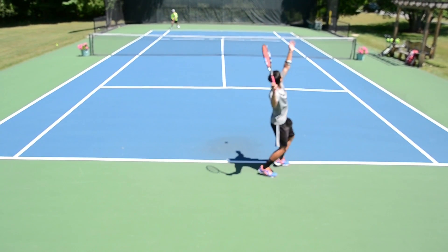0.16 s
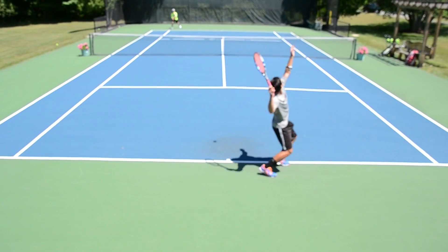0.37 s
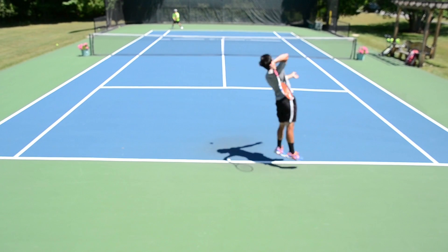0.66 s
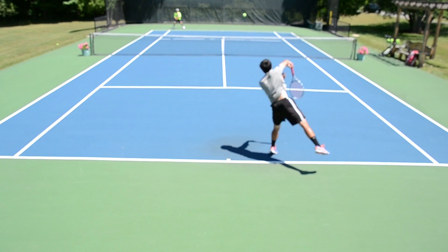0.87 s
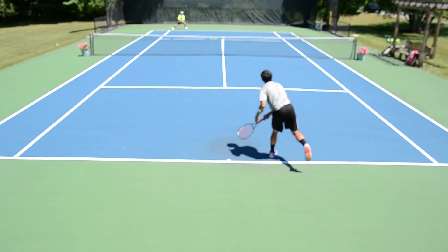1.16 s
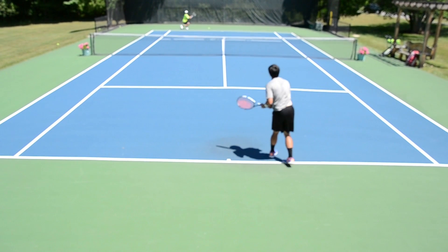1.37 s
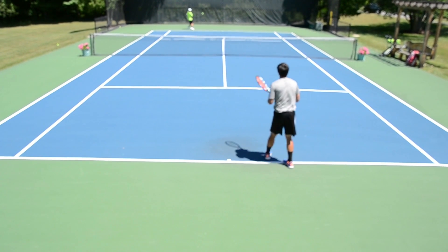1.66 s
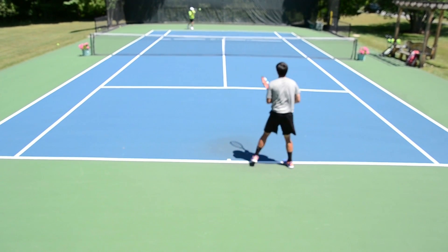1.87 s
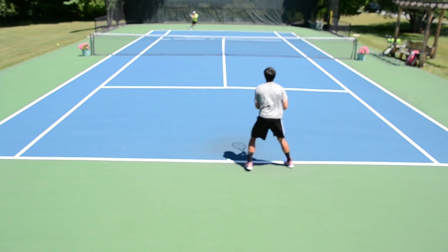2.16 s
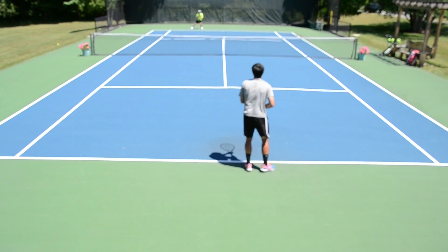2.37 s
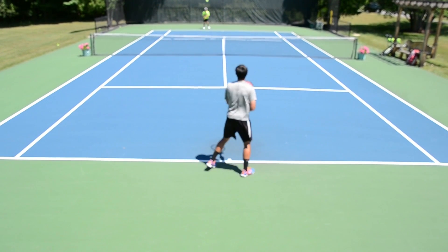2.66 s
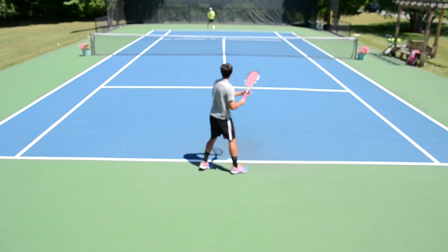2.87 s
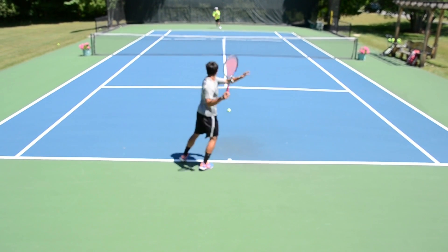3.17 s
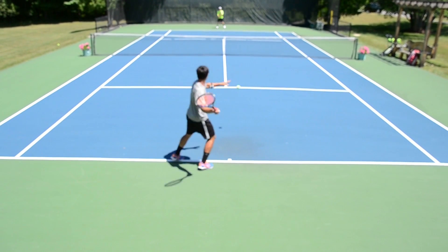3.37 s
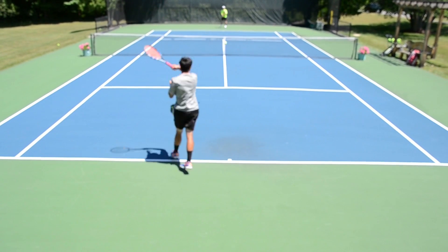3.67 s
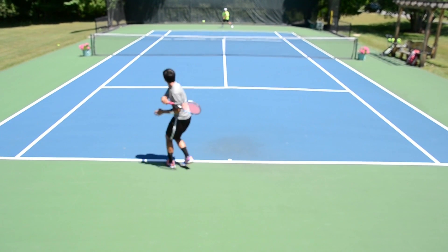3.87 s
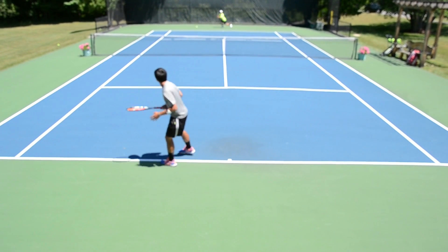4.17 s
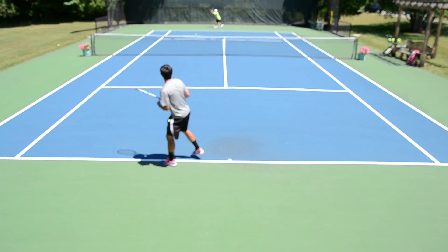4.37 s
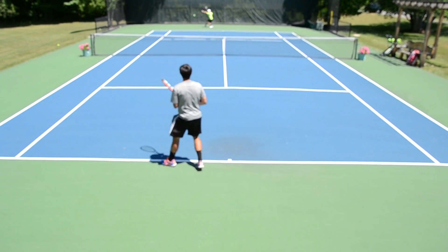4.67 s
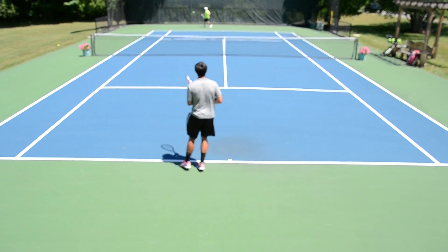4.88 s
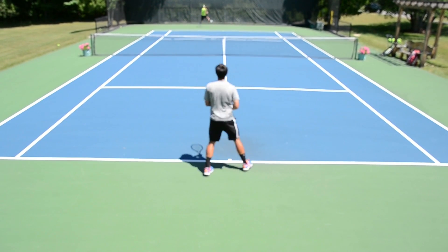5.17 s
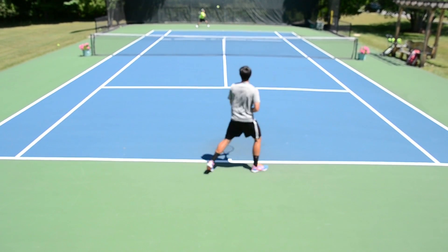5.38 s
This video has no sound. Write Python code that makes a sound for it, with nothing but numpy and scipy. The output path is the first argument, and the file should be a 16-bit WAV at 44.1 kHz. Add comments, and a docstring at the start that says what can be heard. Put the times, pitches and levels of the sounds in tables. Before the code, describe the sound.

An outdoor hard court heard in mono from behind the near baseline, over a quiet airy wash, uneven low rumble and faint, wavering machine whine. Tiny shoe squeaks at 0.6 s precede the serve at 0.85 s: a loud, dry pop with thump, felt crack, briefly ringing strings, a slight swish and quick fence echoes. A landing click follows at 0.97 s, squeaks and a scuff near 1.1 s, soft taps around 1.4 s and a squeak at 1.6 s. The far player's return pops at 1.98 s, softer and more reverberant. Gritty shuffles run from 2.1 to 2.8 s. The ball bounces with a hollow knock at 3.28 s, then the near player hits at 3.67 s, rounder, with a swish. A clicky footfall and strong short squeak come at 3.8 s. Scuffs, taps and faint squeaks continue from 4.0 to 4.9 s; a far hit sounds at 5.13 s, with a last tiny squeak at 5.4 s.

```python
"""Rackets pop in a serve and a short rally on an outdoor hard court, heard from behind the near baseline.
Each stroke is a thump, a felt crack and ringing strings, with echoes from the ground and fences.
Ball and soles land with a click, ring and thump; shoes squeak as gliding tones and scuff as grainy noise.
Swings swish as coloured noise; far off lie an airy wash, an uneven rumble and the whine of a machine."""
import sys
import numpy as np
from scipy import signal
from scipy.fft import rfft, irfft
from scipy.io import wavfile

SR = 44100
rng = np.random.default_rng(int(sys.argv[2]) if len(sys.argv) > 2 else 0)


def transcribe(u):
    """Save the signal u as a 16-bit wav file named by the first command-line argument.

    u: samples, shape (n,) or (channels, n), limited to [-1, 1]; the rate is SR.
    q: integer samples, one column per channel.
    """
    v = np.clip(np.atleast_2d(u).T, -1, 1)
    q = np.round(v * 32767).astype(np.int16)
    wavfile.write(sys.argv[1], SR, q)


N = 243873
TIME = np.arange(N) / SR
BRIEF = TIME[:SR // 10]   # the first 0.1 s, long enough for any single contact

# Strokes of the near and the far player. Each row: start in seconds, level in dB, string tuning ratio,
# thump in dB, thump in Hz, crack in dB, ground echo lag in seconds, ground echo in dB, bass edge in Hz.
NEAR_STROKES = [(0.8472, -13.5, 0.982, 4, 450, -4.5, 0.0066, -3, 50),
                (3.6700, -14.5, 1.034, 0.5, 443, -12.5, 0.003724, 4, 170)]
FAR_STROKES = [(1.9778, -23.5, 0.938, -0.31, 428, -12, 0.0021, -22, 80),
               (5.1258, -18.5, 0.96, -3, 388, -12, 0.002, -13, 80)]
# String bed and frame modes of each racket, before tuning.
# Each row: frequency in Hz, level in dB, build-up in seconds, t60 in seconds.
NEAR_RACKET_MODES = [(569, -4.5, 0.0025, 0.0075), (819, 0, 0.0046, 0.012), (1084, -19.5, 0.0003, 0.044),
                     (1231, -16.5, 0.00055, 0.027), (1457, -3, 0.00078, 0.0064),
                     (1723, -25.5, 0.006, 0.033), (2190, -14.5, 0.00032, 0.012), (2820, -44, 0.0038, 0.022)]
FAR_RACKET_MODES = [(750, -11.5, 0.0055, 0.015), (1094, -2.5, 0.0053, 0.0054), (1380, -6, 0.0012, 0.0085),
                    (1730, -8, 0.00035, 0.019), (2194, -8, 0.00094, 0.01), (3430, -26, 0.0036, 0.0086)]
# Colour of the felt crack. Each row: frequency in Hz, relative density in dB per Hz.
CRACK_SPECTRUM = [(200, -4), (700, 6.5), (1500, 14.5), (2500, -2.5), (3800, 1), (5700, -13), (7500, -24),
                  (9500, -29), (11500, -64)]
# Reflections of each player's strokes from the fences. Each row: lag in seconds, level in dB.
NEAR_ECHOES = [(0.037, -16), (0.072, -27), (0.090, -35)]
FAR_ECHOES = [(0.023, -12.5), (0.035, -22.5), (0.262, -23)]


def strokes(table, modes, echoes, thump_t60, crack_t60, downward_db, echo_t60):
    """The ball flattens with a thump and a crack of felt, and leaves the strings ringing."""
    out = np.zeros(N)
    for s, db, tuning, thump_db, thump_hz, crack_db, ground_s, ground_db, bass_hz in table:
        strings = sum(from_db(mode_db) * mode(hz * tuning, build_up, t60)
                      for hz, mode_db, build_up, t60 in modes)
        thump = from_db(thump_db) * mode(thump_hz, build_up=0.0011, t60=thump_t60)
        # the higher the contact, the later the ground echo; the tilted face beams the crack downward
        direct_path = (0, 0, 0)
        ground_path = (ground_s, ground_db, downward_db)
        for lag, path_db, beam_db in [direct_path, ground_path]:
            felt = noise(CRACK_SPECTRUM, size=len(BRIEF)) * struck(build_up=0.00054, t60=crack_t60)
            crack = from_db(crack_db + beam_db) * felt
            hit = band_pass(strings + thump + crack, bass_hz, high_hz=16000)
            add(out, s + lag, from_db(db + path_db) * hit)
    dull = band_pass(off_axis(out), low_hz=470, high_hz=1900)
    for lag, echo_db in echoes:
        add(out, lag, from_db(echo_db) * smear(dull, t60=echo_t60))
    return out


def off_axis(x, hz=840, width_hz=260, dip_db=-6):
    """The main tone of the strings is beamed along the stroke, so less of it reaches the fences."""
    tone = signal.lfilter(*signal.iirpeak(hz, hz / width_hz, fs=SR), x)
    return x - (1 - from_db(dip_db)) * tone


# Ball and soles landing on the court.
# Each row: start in seconds, level in dB, ring in Hz, click in dB relative to the ring.
LANDINGS = [(0.9739, -27, 1240, 11), (1.021, -39, 500, -16), (1.3798, -30.5, 1210, -5),
            (1.4316, -36, 845, -20), (3.1295, -34.5, 820, -23), (3.2785, -18.5, 1143, -20),
            (3.8034, -24, 955, 11.5), (3.8466, -25.5, 1170, -13), (4.5008, -30.5, 1620, -6.5),
            (5.0560, -33, 1150, -11)]
LANDING_CYCLES = 5.9   # every landing rings for the same number of cycles
LANDING_THUMP_DB = -14


def landings():
    """A click on the hard paint, a hollow ring and a low thump."""
    out = np.zeros(N)
    click = band_pass(np.exp(-BRIEF / 0.00008), low_hz=500, high_hz=5000, order=1)
    click = low_pass(click, hz=5500, order=10)
    click = click / click.max()
    thump = from_db(LANDING_THUMP_DB) * mode(hz=286, build_up=0.0053, t60=0.0019)
    for s, db, hz, click_db in LANDINGS:
        ring = mode(hz, build_up=0.00053, t60=LANDING_CYCLES / hz)
        add(out, s, from_db(db) * (ring + thump + from_db(click_db) * click))
    return out


# Rubber soles slipping. Each row: start in seconds, length in seconds, start in Hz, end in Hz, level in dB,
# growth over the slip in dB, roughness from 0 to 1, octave in dB, share beamed down the court in dB.
SQUEAKS = [(0.572, 0.08, 2200, 2370, -60.5, 0, 0.3, -31, -14),
           (0.649, 0.039, 4200, 3680, -52.5, 3, 0.72, -36, -8),
           (1.062, 0.04, 3126, 3495, -42.5, -9.5, 0.84, -19, 2),
           (1.1, 0.044, 3230, 3110, -47, 3.5, 0.62, -23, 8),
           (1.604, 0.082, 4900, 3910, -41.5, 9.5, 0.68, -26.5, -2),
           (3.803, 0.028, 2400, 2595, -21, 5.5, 0.48, -18.5, -21.5),
           (4.557, 0.03, 3560, 3250, -53.5, 6, 0.35, -19, 10),
           (4.584, 0.029, 3004, 2670, -40, -6.5, 0.73, -29, 4.5),
           (4.807, 0.052, 4800, 4050, -55, 9, 0.66, -33, 4),
           (5.424, 0.017, 5120, 3470, -57.5, -1, 0.8, -42, -12)]
SETTLE_SHARE, RELEASE_SHARE = 0.7, 0.2   # shares of a slip spent settling in pitch and letting go
SMOOTHING = 0.37   # share of the roughness lost as the pitch settles
PITCH_JITTER = 0.1   # rms share of the pitch at full roughness


def squeaks(flutter_db=5, rasp_db=-5, ring_hz=220, catch_s=0.003):
    """Stick and slip of rubber: a tone that catches roughly, glides, settles and lets go, with its echoes."""
    out, beamed, size = np.zeros(N), np.zeros(N), len(BRIEF)
    for s, length, start_hz, end_hz, db, growth_db, rough, octave_db, beam_db in SQUEAKS:
        progress = np.minimum(BRIEF / length, 1)
        glide = np.sin(np.pi / 2 * np.minimum(progress / SETTLE_SHARE, 1)) ** 2
        uneven = rough * (1 - SMOOTHING * glide)

        jitter = PITCH_JITTER * uneven * resonant_noise(0, 750, size=size)
        pitch = (start_hz + (end_hz - start_hz) * glide) * (1 + jitter)
        phase = 2 * np.pi * np.cumsum(pitch) / SR
        overtones = np.sin(2 * phase) + from_db(-21.5) * np.sin(3 * phase)
        tone = np.sin(phase) + from_db(octave_db) * overtones
        rasp = from_db(rasp_db) * uneven * resonant_noise(start_hz, 620, size=size)

        contact = np.minimum(BRIEF / catch_s, 1) * np.minimum((1 - progress) / RELEASE_SHARE, 1)
        flutter = flutter_db * uneven * resonant_noise(0, 200, size=size)
        grip = contact * from_db(growth_db * (progress - .5) + flutter)
        grip = low_pass(grip, hz=ring_hz, order=1)   # the tread rings on briefly
        squeak = from_db(db) * grip * (np.sqrt(2) * tone + rasp)
        add(out, s, squeak)
        add(beamed, s, from_db(beam_db) * squeak)
    return out + side_fence(out) + back_fence(beamed)


# The side fence answers the squeaks. One row: lag in seconds, level in dB, t60 in seconds.
SIDE_FENCE = (0.023, -15.5, 0.3)


def side_fence(x):
    """A blurred return that lingers briefly after a squeak."""
    lag, db, t60 = SIDE_FENCE
    out = np.zeros(N)
    add(out, lag, from_db(db) * smear(band_pass(x, low_hz=3400, high_hz=4400), t60))
    return out


BACK_FENCE_S, BACK_FENCE_SPREAD_S = 0.17, 0.056   # lag of the strongest return, spread around it


def back_fence(x, hz=3150, width_hz=330, scale_db=-15):
    """Shoe noise skims along the court and returns blurred from the far end."""
    blur = swell(BACK_FENCE_S, BACK_FENCE_SPREAD_S, BACK_FENCE_SPREAD_S)
    response = (resonant_noise(hz, width_hz) * blur)[:SR]
    response = response / np.abs(rfft(response)).max() * 2   # strongest frequency at gain 2
    return from_db(scale_db) * signal.fftconvolve(x, response)[:N]


# Soles dragging over grit.
# Each row: time of the strongest drag in seconds, rise in seconds, tread level in dB, grit level in dB.
SCUFFS = [(1.085, 0.011, -43.5, -45.5), (1.461, 0.0089, -44, -44.5), (2.085, 0.063, -72, -57.5),
          (2.184, 0.033, -50.5, -51.5), (2.444, 0.0092, -60.5, -48.5), (2.486, 0.013, -40, -66),
          (2.586, 0.053, -47, -49.5), (2.803, 0.014, -63, -52.5), (3.138, 0.015, -69, -58),
          (4.045, 0.035, -60, -51), (4.120, 0.026, -67, -58.5), (4.630, 0.048, -52, -51.5),
          (4.892, 0.021, -60.5, -55)]
# Colour of the grit. Each row: frequency in Hz, relative density in dB per Hz.
GRIT_SPECTRUM = [(500, -17), (1500, 18.5), (3000, 9.5), (5500, 0.5), (7500, -16), (9800, -36.5),
                 (11500, -92.5)]
SCUFF_STOP_S, TREAD_HZ = 0.012, 2730   # every drag stops as quickly and rings the same tread


def scuffs(width_hz=600, grain_db=2.0):
    """A sliding sole: grainy hiss of grit and a broad resonance of the tread."""
    grit = noise(GRIT_SPECTRUM)
    tread = resonant_noise(TREAD_HZ, width_hz)
    drags = sum(swell(s, rise, SCUFF_STOP_S) * (from_db(tread_db) * tread + from_db(grit_db) * grit)
                for s, rise, tread_db, grit_db in SCUFFS)
    return drags * from_db(grain_db * resonant_noise(0, 320))


# Racket cutting the air.
# Each row: time of the fastest point in seconds, rise in seconds, fall in seconds, level in dB.
SWISHES = [(0.848, 0.029, 0.044, -47), (3.672, 0.013, 0.09, -45)]
# Colour of the rushing air. Each row: frequency in Hz, relative density in dB per Hz.
SWISH_SPECTRUM = [(100, -49), (300, 8.5), (900, 3.5), (2000, 8.5), (4000, -6), (7000, -21.5), (11000, -50)]


def swishes():
    """Air rushes through the strings around the fastest point of each swing."""
    swings = sum(from_db(db) * swell(s, rise, fall) for s, rise, fall, db in SWISHES)
    return noise(SWISH_SPECTRUM) * swings


# Scatter from fences and trees.
# Each row: frequency in Hz, early gain in dB, early t60 in seconds, late gain in dB.
SCATTER = [(198, -13, 0.22, -24), (487, -29.5, 0.15, -34), (900, -18.5, 0.35, -16.5),
           (1610, -15, 0.13, -19.5), (3000, -17, 0.14, -25.5), (4970, -15, 0.27, -33),
           (10000, -10, 0.17, -28)]
LATE_T60_S = 1


def surroundings(x):
    """Quick scatter from the fences, then a faint long tail from the trees."""
    t, response = TIME[:SR], 0
    onset = 1 - np.exp(-(t / 0.0034) ** 2)
    late = onset * from_db(-60 * t / LATE_T60_S)
    edges = np.geomspace(100, 12800, 8)   # octave bands, in Hz
    for low, high in zip(edges, edges[1:]):
        hz = np.sqrt(low * high)
        octave = signal.butter(3, [low, high], "band", fs=SR, output="sos")
        band = signal.sosfilt(octave, rng.standard_normal(SR))
        early = onset * from_db(-60 * t / at_hz(SCATTER, hz, axis=2))
        fences = from_db(at_hz(SCATTER, hz)) * early / np.linalg.norm(early)
        trees = from_db(at_hz(SCATTER, hz, axis=3)) * late / np.linalg.norm(late)
        response = response + band * (fences + trees)
    return signal.fftconvolve(x, response)[:N]


# Colours of the distant wash and rumble. Each row: frequency in Hz, relative density in dB per Hz.
AIR_SPECTRUM = [(20, -38.5), (70, -20.5), (180, -12), (400, -2.5), (660, -3.5), (1000, 2), (1600, -3),
                (2000, -7.5), (2500, -14.5), (3300, -21.5), (5500, -30), (7400, -37.5), (7900, -47.5),
                (8600, -37.5), (10500, -52), (12000, -75.5)]
RUMBLE_SPECTRUM = [(20, -5.5), (60, 7), (110, 5), (190, 11), (300, 4.5), (600, -46.5)]
# Their course at the microphone, before trims. Each row: time in seconds, level in dB.
AIR_LEVEL = [(0, -51.5), (0.7, -49), (2.1, -50), (2.8, -50.5), (4.1, -49), (4.9, -50.5), (5.5, -49)]
RUMBLE_LEVEL = [(0, -59.5), (0.7, -52), (1.2, -59), (2.0, -55.5), (2.4, -61), (3.0, -54.5), (3.5, -63.5),
                (5.1, -66), (5.53, -51)]
# Distant machine, narrow bands of whine. Each row: centre in Hz, width in Hz, level in dB before its swell.
WHINE_BANDS = [(1076, 18, -71.5), (1185, 8.6, -63), (1353, 42, -62.5), (1687, 69, -56), (2828, 15, -77.5)]
# Distant machine, steady tones. Each row: frequency in Hz, level in dB.
MACHINE_TONES = [(593, -59.5), (2835, -69)]


def outdoors(air_db=-2.0, rumble_db=-2.5, waver_db=1.84, whine_swell_db=2.5):
    """Distant wash, low uneven rumble and the whine of a machine."""
    waver = waver_db * resonant_noise(0, 23)
    air = from_db(in_time(AIR_LEVEL) + air_db + waver) * noise(AIR_SPECTRUM)
    rumble = from_db(in_time(RUMBLE_LEVEL) + rumble_db) * noise(RUMBLE_SPECTRUM)
    tones = sum(from_db(db) * wavering_tone(hz) for hz, db in MACHINE_TONES)
    whine = sum(from_db(db + whine_swell_db * resonant_noise(0, 5.4)) * resonant_noise(hz, width)
                for hz, width, db in WHINE_BANDS)
    return air + rumble + tones + whine


def wavering_tone(hz, wander_hz=2.04, waver_db=-0.25):
    """A far tone, unsteady in pitch and level through moving air; about unit power."""
    phase = 2 * np.pi * np.cumsum(hz + wander_hz * resonant_noise(0, 9.3)) / SR
    return np.sqrt(2) * np.sin(phase) * from_db(waver_db * resonant_noise(0, 8.3))


def struck(build_up, t60):
    """Grows while the contact lasts, holds briefly, then is damped ever faster."""
    growth = np.sin(np.pi / 2 * np.minimum(BRIEF / build_up, 1))
    return growth * from_db(-60 * (np.maximum(BRIEF - build_up, 0) / t60) ** 2)


def mode(hz, build_up, t60):
    """One struck resonance."""
    return struck(build_up, t60) * np.sin(2 * np.pi * hz * BRIEF)


def smear(x, t60):
    """Reflection from an uneven surface: about the same power, spread in time."""
    scatter = rng.standard_normal(len(BRIEF)) * from_db(-60 * BRIEF / t60)
    return signal.fftconvolve(x, scatter / np.linalg.norm(scatter))


def swell(s, rise, fall):
    """A lopsided bell of height 1 at time s; rise and fall are its Gaussian spreads in seconds."""
    spread = np.where(TIME < s, rise, fall)
    return np.exp(-.5 * np.minimum(((TIME - s) / spread) ** 2, 10 ** 2))


def noise(spectrum, size=N):
    """Unit noise with a given colour."""
    colour = from_db(at_hz(spectrum, np.fft.rfftfreq(size, 1 / SR)))
    return rms_one(irfft(rfft(rng.standard_normal(size)) * colour, size))


def resonant_noise(hz, width_hz, size=N):
    """Unit noise twice through one resonance; at 0 Hz a random fluctuation."""
    detune = (np.fft.rfftfreq(size, 1 / SR) - hz) / width_hz
    return rms_one(irfft(rfft(rng.standard_normal(size)) / (1 + detune ** 2), size))


def low_pass(x, hz, order=2):
    """Butterworth low-pass."""
    return signal.sosfilt(signal.butter(order, min(hz, SR / 2 - 1), fs=SR, output="sos"), x)


def band_pass(x, low_hz, high_hz, order=2):
    """Butterworth band-pass."""
    edges = [low_hz, min(high_hz, SR / 2 - 1)]
    return signal.sosfilt(signal.butter(order, edges, "band", fs=SR, output="sos"), x + 1e-18)


def from_db(db):
    """Decibels to gain."""
    return 10 ** (np.asarray(db) / 20)


def rms_one(x):
    """Scale to unit power."""
    return x / np.sqrt(np.mean(x ** 2) + 1e-20)


def in_time(rows):
    """A control curve at every sample."""
    return np.interp(TIME, *np.transpose(rows))


def at_hz(points, hz, axis=1):
    """One column of a table, read on a log-frequency axis."""
    table = np.array(points)
    return np.interp(np.log(np.maximum(hz, 1)), np.log(table[:, 0]), table[:, axis])


def add(track, s, sound):
    """Mix a sound into a track from time s on."""
    at = max(round(s * SR), 0)
    part = sound[:max(len(track) - at, 0)]
    track[at:at + len(part)] += part


def scene():
    """Both players, the court around them and the background; the far player sounds wetter."""
    near = strokes(NEAR_STROKES, NEAR_RACKET_MODES, NEAR_ECHOES,
                   thump_t60=0.0071, crack_t60=0.013, downward_db=4.5, echo_t60=0.012)
    far = strokes(FAR_STROKES, FAR_RACKET_MODES, FAR_ECHOES,
                  thump_t60=0.0099, crack_t60=0.012, downward_db=1, echo_t60=0.06)
    shoes = squeaks() + scuffs()
    taps = landings()
    rackets_sent = from_db(1.5) * off_axis(near) + from_db(5.5) * far
    court_sent = from_db(-7.0) * shoes + from_db(-1.0) * taps
    wet = surroundings(rackets_sent + court_sent)
    play = near + far + shoes + taps + swishes() + wet
    play = band_pass(play, low_hz=94, high_hz=13700)   # small sources radiate little bass
    return (play + outdoors())[None]


def record(dry):
    """One microphone channel, its top cut steeply above 10.9 kHz."""
    return signal.sosfilt(signal.ellip(10, 0.1, 70, 10900, fs=SR, output="sos"), dry)


dry = scene()
out = record(dry)
transcribe(out)
```